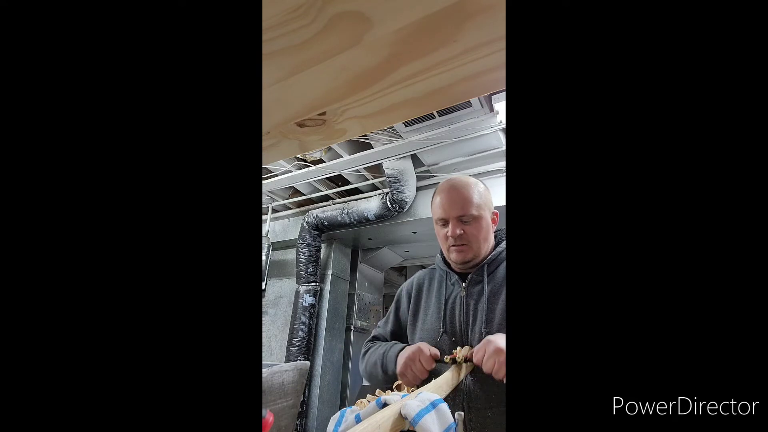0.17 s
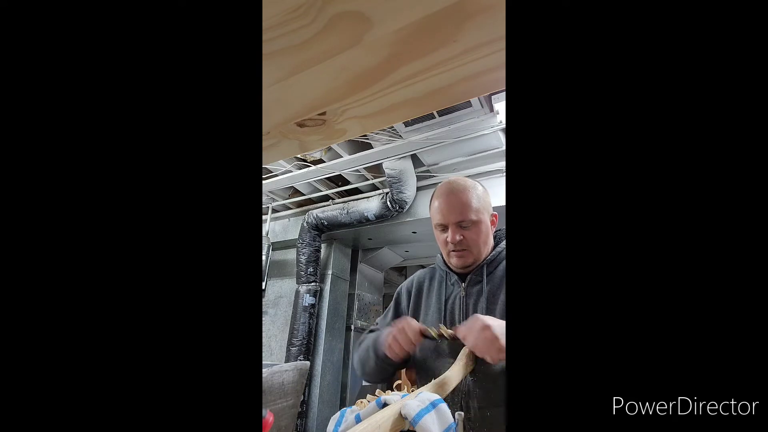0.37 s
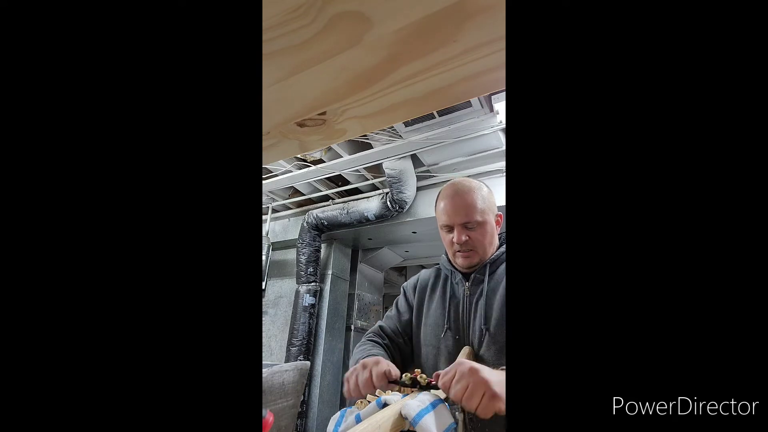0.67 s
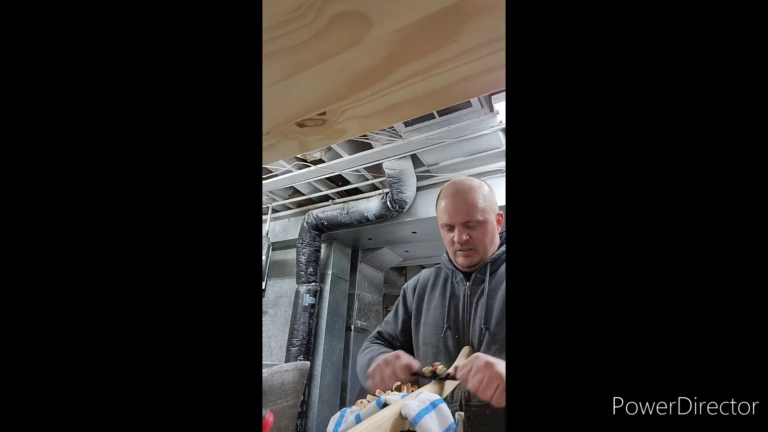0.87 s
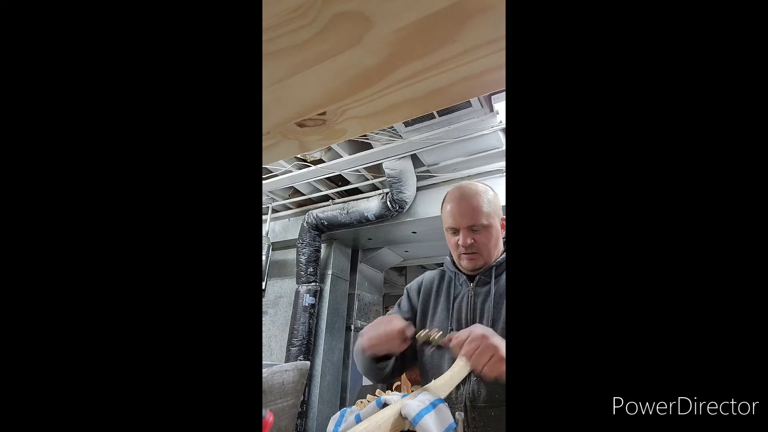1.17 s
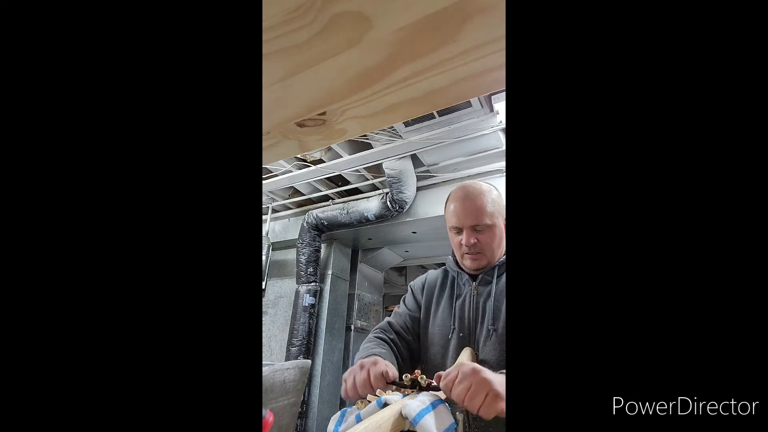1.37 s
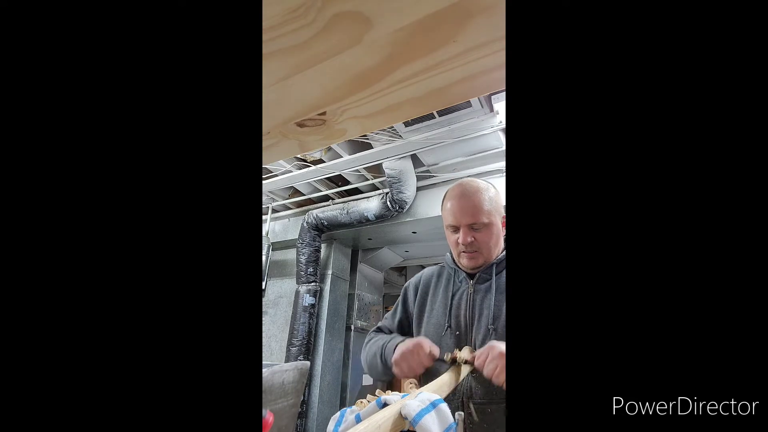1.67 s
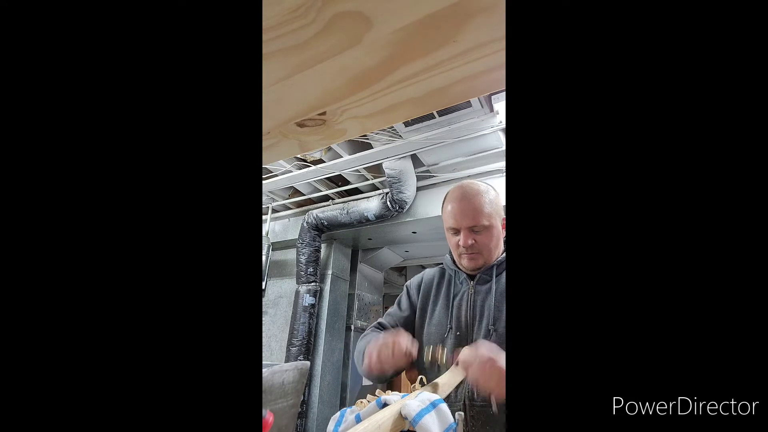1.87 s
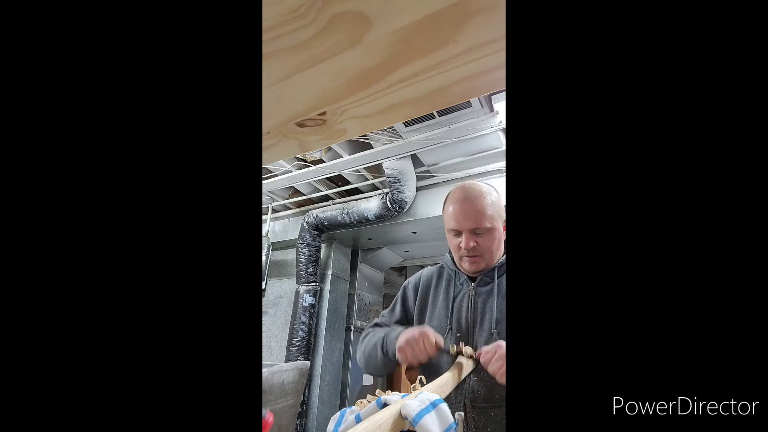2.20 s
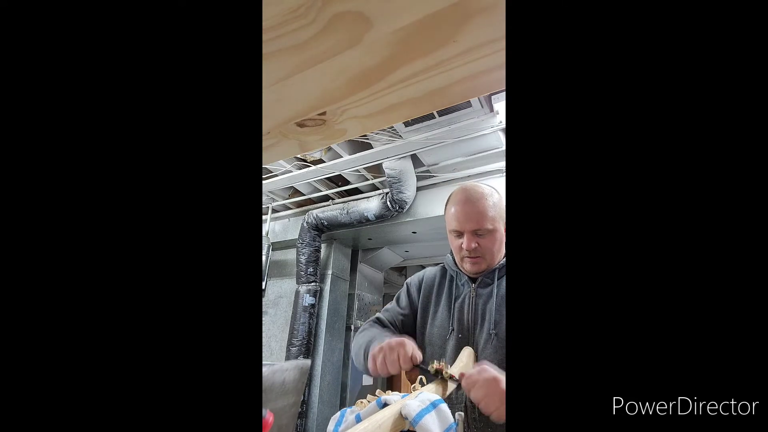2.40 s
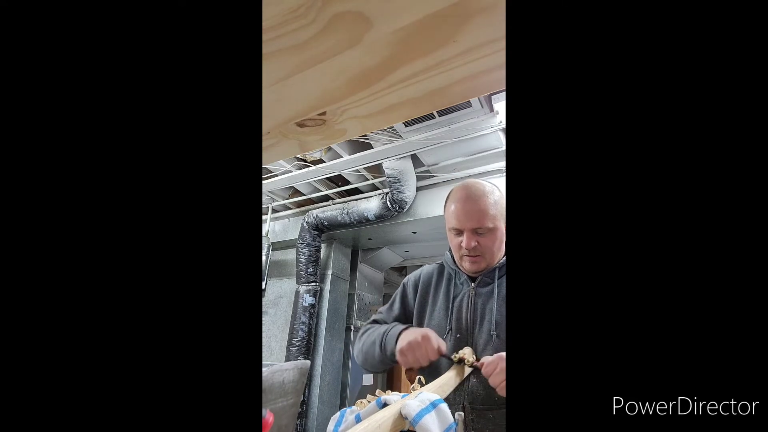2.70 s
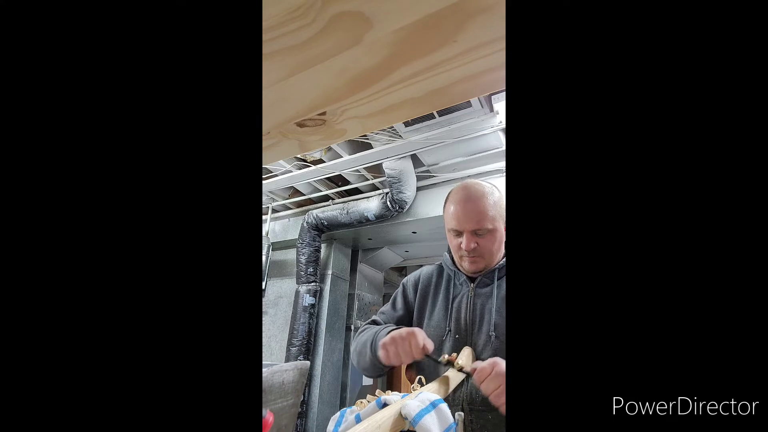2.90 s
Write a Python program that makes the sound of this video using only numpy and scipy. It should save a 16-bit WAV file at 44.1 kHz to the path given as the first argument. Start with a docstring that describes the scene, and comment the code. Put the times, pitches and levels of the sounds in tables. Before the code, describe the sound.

A spokeshave makes five quick rasping cuts and one faint slide along a wooden handle, with slight squeaks. Between cuts the tool clacks against the wood and the bench thuds. Ventilation rumbles faintly in the small workshop.

```python
"""A small workshop: a spokeshave makes five quick cuts and one faint slide along a wooden handle.
The blade tears fibres, rasping, hissing and squeaking along the grain. Each time the tool meets
the wood it clacks and sets tool and handle ringing; the bench that holds the work shudders with
the drag and booms when jolted. One fibre snaps, the iron clinks, and ventilation rumbles faintly."""
import sys
import numpy as np
from scipy import signal
from scipy.fft import rfft, irfft, next_fast_len
from scipy.io import wavfile

SR = 44100
rng = np.random.default_rng(int(sys.argv[2]) if len(sys.argv) > 2 else 0)


def int16_out(signal):
    """Quantize to a 16-bit WAV file."""
    q = np.round(np.clip(np.atleast_2d(signal).T, -1, 1) * 32767)
    wavfile.write(sys.argv[1], SR, q.astype(np.int16))


N = 134505
TIME = np.arange(N) / SR
RING_DB = -7.5  # trim on the struck ringing of tool, handle and iron

# modes of the tool on the work: pitch_hz, struck_db, rubbed_db, t60_s
TOOL_MODES = [(746.4, -5.5, -2.5, 0.062), (1076, -15, -23, 0.071), (1310, -5.5, -9, 0.024),
              (1441, -13, -4, 0.07), (1653, -8, -5, 0.16), (1940, -16.5, -14, 0.17),
              (2459, -16, -11.5, 0.11), (2590, -17.5, -4.5, 0.04), (2862, -10.5, -2, 0.043),
              (3067, -12.5, -5.5, 0.029), (3660, -19, -6.5, 0.058), (4240, -15, -10, 0.04),
              (4774, -23, -6, 0.065)]
# stereo image, near mono in the bass and wide above: frequency_hz, left_right_correlation
STEREO_LIKENESS = [(60, 0.97), (130, 0.99), (250, 1), (480, 0.88), (950, 0), (3800, 0.17), (15000, 0)]


def from_db(db):
    """Decibels to gain."""
    return 10 ** (np.asarray(db) / 20)


def unit_power(x):
    """Scale to an RMS of one."""
    return x / np.sqrt(np.mean(x ** 2) + 1e-20)


def at_hz(points, hz):
    """Read a curve on a log-frequency axis."""
    frequencies, values = np.transpose(points)
    return np.interp(np.log(hz + 1e-3), np.log(frequencies), values)


def noise(colour):
    """Coloured stereo noise, alike in both ears only in the bass."""
    size = next_fast_len(N)
    hz = np.arange(size // 2 + 1) * SR / size
    mid, side = rfft(rng.standard_normal((2, size)))
    alike = at_hz(STEREO_LIKENESS, hz)
    pair = np.sqrt(1 + alike) * mid + np.sqrt(1 - alike) * side * [[1], [-1]]
    spectrum = pair * from_db(at_hz(colour, hz)) * (hz > 20)
    return unit_power(irfft(spectrum, size)[:, :N])


def flutter(per_s, depth_db):
    """A gain that wanders at random."""
    knots = rng.standard_normal(N)
    return from_db(depth_db * np.interp(TIME * per_s, np.arange(N), knots))


def wavering(hz, waver_hz):
    """A tone of unit power whose pitch wanders, differently left and right."""
    knots = rng.standard_normal((2, 1000))
    wander = np.array([np.interp(TIME * 150, np.arange(len(row)), row) for row in knots])
    return np.sqrt(2) * np.sin(2 * np.pi * np.cumsum(hz + waver_hz * wander, axis=1) / SR)


def ring(x, hz, t60):
    """One mode: a unit click starts a dying sine of height 1."""
    decay, step = from_db(-60 / (t60 * SR)), 2 * np.pi * hz / SR
    return signal.lfilter([0, np.sin(step)], [1, -2 * decay * np.cos(step), decay ** 2], x + 1e-18)


def driven(x, hz, t60):
    """A mode that passes on the power of a noisy drive."""
    return ring(x, hz, t60) * np.sqrt(4 * np.log(1000) / (t60 * SR))


def ventilation():
    """Moving air: a low rush with a faint hum and whine."""
    # colour of the rush: frequency_hz, level_db
    air_colour = [(15, -29), (25, 3.5), (96, 1), (165, 2), (261, -10), (315, -6.5), (555, -13),
                  (671, -19.5), (855, -13), (1120, -25), (1680, -26.5), (2030, -31), (2200, -31),
                  (4670, -32.5), (8460, -55.5), (12700, -57), (15700, -59)]
    # hum and whine: pitch_hz, level_db
    vent_tones = [(135, -48.5), (1672, -73.5)]
    tones = sum(from_db(db) * wavering(hz, waver_hz=12.9)[0] for hz, db in vent_tones)
    return from_db(-42) * noise(air_colour) + tones


def fibres(per_s=5000, spread_db=3, cap_db=12):
    """Wood grit: tiny clicks of uneven size, different left and right."""
    sizes = from_db(np.minimum(rng.exponential(spread_db, (2, N)), cap_db))
    signs = rng.choice([-1, 1], (2, N))
    return unit_power(sizes * signs * (rng.random(N) < per_s / SR))


def cuts():
    """The blade tears fibres, which rasp, hiss and ring the tool; the bench shudders with the drag."""
    # one envelope per slide along the wood: time_s, rasp_db, hiss_db, shudder_db
    slides = [
        [(0.0, -44.5, -58, -38.5), (0.058, -40, -53, -33), (0.082, -42.5, -47, -59), (0.092, -36.5, -43.5, -28),
         (0.112, -52, -60, -46), (0.156, -74, -64, -58), (0.18, -74, -87, -41)],
        [(0.48, -81, -103, -63), (0.526, -73, -85, -58), (0.54, -58, -81, -58), (0.572, -69, -70, -64),
         (0.592, -54, -65, -56), (0.616, -69, -79, -69), (0.645, -52, -67, -61)],
        [(0.74, -56, -71, -39), (0.89, -48, -49.5, -41), (0.958, -52.5, -63, -85), (1.004, -49.5, -56, -76),
         (1.03, -43.5, -56, -32.5), (1.068, -48, -50.5, -21.5), (1.18, -75, -86, -73)],
        [(1.46, -74, -96, -33.5), (1.512, -50.5, -62, -42), (1.588, -46.5, -54.5, -39.5),
         (1.684, -45.5, -58, -40.5), (1.772, -48.5, -57, -27.5), (1.79, -56, -56, -61), (1.86, -67, -99, -52)],
        [(2.06, -50, -65, -32), (2.09, -49, -83, -31), (2.162, -49.5, -69, -39), (2.232, -46.5, -53, -24),
         (2.278, -48.5, -60, -29.5), (2.294, -66, -86, -33), (2.37, -65, -109, -41.5)],
        [(2.56, -48, -78, -45), (2.656, -46.5, -66, -39), (2.692, -40, -44.5, -22), (2.72, -44.5, -46.5, -31),
         (2.786, -52, -89, -28), (2.854, -73, -84, -38.5), (2.93, -56, -109, -40)],
    ]
    # colour of the rasp: frequency_hz, level_db
    rasp_colour = [(200, 15), (500, 6), (900, 5.5), (2100, -3), (3000, -7), (4800, -4), (7000, -14),
                   (9000, -53), (16000, -40)]
    # colour of the bench's shudder: frequency_hz, level_db
    shudder_colour = [(25, -25), (50, 15.5), (80, -9.5), (125, 4.5), (180, -8), (280, -9.5), (500, -23),
                      (1000, -18.5), (4000, -62.5)]
    fade_s = 0.072
    rasp_level, hiss_level, shudder_level = levels = np.zeros((3, N))
    for slide in slides:
        times, *curves_db = np.transpose(slide)
        outside_s = np.maximum(times[0] - TIME, TIME - times[-1])
        fade = np.clip(1 - outside_s / fade_s, 0, 1)
        for level, db in zip(levels, curves_db):
            level += fade * from_db(np.interp(TIME, times, db))
    grit = fibres() * rasp_level
    rings = sum(from_db(db - 8) * driven(grit * flutter(per_s=40, depth_db=4), hz, t60)
                for hz, _, db, t60 in TOOL_MODES)
    rasp = rasp_level * (from_db(-2) * noise(rasp_colour) + rasp_climbs())
    hiss = from_db(-4) * hiss_level * (high_hiss() + splinters())
    shudder = from_db(-2) * shudder_level * noise(shudder_colour)
    return rings + (rasp + hiss) * flutter(per_s=39, depth_db=1.5) + shudder


def high_hiss():
    """The finest tearing noise, louder on the left."""
    # colour of the hiss: frequency_hz, level_db
    hiss_colour = [(2000, -26), (6000, 8), (7500, 4), (9500, -3.5), (11000, 1.5), (12500, 6), (15500, 5.5)]
    return noise(hiss_colour) * from_db([[2.5], [-2.5]])


def splinters():
    """Sparse bright ticks of fibres parting at the edge."""
    ticks = fibres(per_s=210, spread_db=15, cap_db=45)
    highpass = signal.butter(2, 11300, "high", fs=SR, output="sos")
    return from_db(-11.5) * unit_power(signal.sosfilt(highpass, ticks + 1e-18))


def squeaks():
    """The blade catches: short stick-slip tones that swell and fade."""
    # catches of the blade: start_s, length_s, pitch_hz, level_db
    catches = [(0.0, 0.015, 3920, -45), (0.011, .022, 3700, -50), (0.051, 0.073, 1810, -44),
               (0.89, 0.096, 3040, -51), (1.636, 0.033, 1367, -42.5), (1.67, 0.037, 3700, -53),
               (1.782, 0.053, 4070, -61)]
    out = 0
    for start, length, hz, db in catches:
        swell = np.sin(np.pi * np.clip((TIME - start) / length, 0, 1))
        out += from_db(db) * swell * wavering(hz, waver_hz=34.9)
    return out


def thuds():
    """Soft pushes boom the bench: the longer the push, the duller the thud; the grip shifts its pitch."""
    # jolts of the work against the bench: start_s, level_db, push_s, pitch_ratio
    jolts = [(0.109, -19, 0.0077, 0.56), (0.221, -3, 0.0017, 1.154), (0.2281, -1, 0.0012, 1),
             (0.665, -8.5, 0.0052, 0.826), (0.872, -9.5, 0.015, 0.84), (1.039, -15, 0.0028, 0.48),
             (1.054, -21, 0.0061, 1.06), (1.065, -8, 0.0048, 1.12), (1.395, -7, 0.0043, 1.13),
             (1.404, -10.5, 0.0075, 0.97), (1.736, -9.5, 0.0052, 0.66), (1.765, -10.5, 0.0026, .85),
             (2.024, -7.5, 0.0043, 1.065), (2.084, -7, 0.0017, 0.73), (2.206, -6.5, 0.0067, 0.95),
             (2.279, -15, 0.0019, 0.68), (2.517, -6, 0.0069, 0.856)]
    # modes of the bench: base_pitch_hz, level_db, t60_s
    bench_modes = [(67, -16.5, 0.21), (111.3, 0, 0.078), (134, 0, 0.038), (200, 1.5, 0.031),
                   (330.8, -3.5, 0.06), (410.7, -2, 0.039), (538, -14.5, 0.06), (705, -11, .045)]
    out, age = np.zeros((2, N + SR)), TIME[:SR // 2]
    build_up = 1 - np.exp(-age / 0.0016)  # the bench takes a moment to get moving
    for start, level_db, push_s, ratio in jolts:
        push = np.sin(np.pi * np.minimum(age / push_s, 1)) ** 2
        first = int(start * SR)
        for k, (hz, mode_db, t60) in enumerate(bench_modes):
            gain = (-1) ** k * from_db(level_db + mode_db - 1)
            swing = gain * ring(push / push.sum(), hz * ratio, t60) * build_up
            speed = np.gradient(swing) * SR / (2 * np.pi * hz * ratio)
            # speed and swing lie a quarter cycle apart, which gives the stereo width
            alike = at_hz(STEREO_LIKENESS, hz)
            mid, side = np.sqrt((1 + alike) / 2) * speed, np.sqrt((1 - alike) / 2) * swing
            out[:, first:first + len(age)] += mid + side * [[1], [-1]]
    return out[:, :N]


def clacks():
    """Tool meets wood: a short gritty crunch that cracks and sets tool and handle ringing."""
    # contacts, most ringing the handle at the pitch of the spot they touch; rows near 520 Hz are the hollow
    # tock as the blade runs off the end of the cut: start_s, level_db, # attack_s, length_s, treble_db,
    # hiss_db, handle_db, handle_pitch_hz, left_over_right_db
    contacts = [(0.134, -42.5, .002, 0.0054, -11, -12, 2.5, 1400, -1),
                (0.188, -36.5, .002, 0.0056, -3.5, -15, 3, 1750, -1),
                (0.208, -41.5, .0065, 0.0086, -1, 39.5, -1, 1300, 0),
                (0.218, -19.5, .0017, 0.0068, -10.5, -10, -6, 1393, -5.5),
                (0.228, -20.5, .0011, .007, 0, 21, -6.5, 2970, 2.5),
                (0.252, -36.5, .0026, 0.023, -1.5, 22.5, -2.5, 3280, -4),
                (0.345, -49.5, .003, 0.013, -7, 23.5, -11, 1700, 1),
                (0.6611, -19, .0012, 0.0052, -1, 6, 3.5, 1014, -1.5),
                (0.674, -37.5, .002, 0.0042, -6, -3, 12, 1930, 4),
                (1.027, -46.5, .0046, .02, -2, 37.5, -7, 2800, 1),
                (1.064, -43.5, 0.006, 0.014, -4.5, 25, 11.5, 530, -6),
                (1.387, -22, 0.0021, 0.0065, 0, 11, 3, 1110, -2),
                (1.411, -37, .002, 0.008, -8, -8, -6, 1490, 1),
                (1.584, -40, 0.0059, 0.012, -1.5, 23, 3, 1644, -4),
                (1.728, -44, .008, 0.012, 0, 18, 12.5, 1178, -11),
                (1.767, -35, 0.001, 0.0083, -7, 18.5, 9, 530, -1),
                (2.0191, -26, 0.0032, 0.008, 0, 8, 13, 1156, -6),
                (2.07, -43, .002, 0.0054, -3, -11, 1, 1370, 5),
                (2.086, -27, .0036, 0.0072, -14, -24, 8.5, 517, 0),
                (2.11, -37.5, .002, 0.0086, 2, -9, 0.5, 2390, -2.5),
                (2.182, -39, .0015, 0.013, -3.5, -6, 4, 1450, -2.5),
                (2.227, -39, .004, 0.019, -1.5, 1, 0.5, 2870, -7),
                (2.278, -35.5, 0.0028, 0.0038, -7, -25, 5.5, 537, -1.5),
                (2.288, -36, .002, 0.012, -2, -16, 1.5, 2354, 1.5),
                (2.512, -21.5, 0.003, 0.011, 1.5, -4, 8, 1173, -1.5),
                (2.559, -41, .003, 0.012, -7, -13, 14.5, 1400, -2),
                (2.598, -35.5, .0015, 0.012, 4, -8, 4.5, 2265, -2.5),
                (2.684, -35, .0015, 0.0059, 5.5, 7, 6, 1600, -1),
                (2.747, -41, .0028, 0.0085, 4, 19, -4, 2940, -1),
                (2.776, -35, .0012, 0.0079, -4, -8, -8, 2310, -4.5)]
    # colour of the woody knock: frequency_hz, level_db
    knock_colour = [(150, 3.5), (330, 10), (550, -1.5), (750, 7), (1150, 3), (1600, -5.5), (2200, -5.5),
                    (3500, -55.5), (16000, -77)]
    # colour of the bright crack: frequency_hz, level_db
    crack_colour = [(500, -46.5), (1500, -3), (2700, 12.5), (3700, 7), (5000, -3.5), (7300, -9.5),
                    (9000, -59), (16000, -72)]
    graze_s, decay_s, handle_t60_s = 0.0065, 0.007, 0.032  # the hands damp the handle
    body, treble, top, handle = np.zeros((4, 2, N))
    grit, handle_grit = fibres(), fibres()
    for start, db, attack, length, treble_db, hiss_db, handle_db, handle_hz, pan_db in contacts:
        near = np.abs(TIME - start) < 0.1
        age = TIME[near] - start
        # the sole grazes the wood just before it lands
        graze = from_db(-20) * np.exp(np.minimum(age, 0) / graze_s)
        rise = np.clip(age / attack, 0, 1) + graze
        fall = np.exp(-np.maximum(age - length, 0) / decay_s)
        envelope = rise * fall * from_db([[db + pan_db / 2], [db - pan_db / 2]])
        body[:, near] += envelope
        treble[:, near] += from_db(treble_db) * envelope
        top[:, near] += from_db(hiss_db) * envelope
        handle_drive = handle_grit[:, near] * envelope
        handle[:, near] += from_db(handle_db) * driven(handle_drive, handle_hz, handle_t60_s)
    tool = sum(from_db(db) * driven(grit * (body if hz < 2000 else treble), hz, t60)
               for hz, db, _, t60 in TOOL_MODES)
    knock = from_db(-1) * body * noise(knock_colour)
    crack = from_db(-8) * treble * noise(crack_colour)
    hiss = from_db(-36.5) * top * high_hiss()
    crunch = (knock + crack + hiss) * flutter(per_s=680, depth_db=2)
    return from_db(RING_DB) * (handle + tool) + crunch


def rasp_climbs():
    """The rasp's resonance climbs, slowly at first, as the blade nears the end of the handle."""
    # climbing stretches of the long cuts: start_s, end_s
    stretches = [(0.879, 0.96), (1.58, 1.76)]
    from_hz, to_hz, width_hz = 2850, 3600, 650
    lowpass = signal.butter(2, width_hz / 2, fs=SR, output="sos")
    wobble = unit_power(signal.sosfilt(lowpass, rng.standard_normal((2, N))))
    sweeps = 0
    for start, end in stretches:
        progress = np.clip((TIME - start) / (end - start), 0, 1)
        hz = from_hz + (to_hz - from_hz) * progress ** 2
        swell = np.sqrt(np.abs(np.sin(np.pi * progress)))
        sweeps += swell * np.sin(2 * np.pi * np.cumsum(hz) / SR)
    return from_db(-6) * np.sqrt(2) * sweeps * wobble  # the wobble smears the tone into a noise band


def snap(at_s=2.0348):
    """A fibre snaps with one sharp, bright tick."""
    # modes of the tick: pitch_hz, level_db, t60_s
    tick_modes = [(4330, -27, 0.0056), (4600, -24, 0.0061)]
    click = np.zeros(N)
    click[int(at_s * SR)] = 1
    return sum(from_db(db) * ring(click, hz, t60) for hz, db, t60 in tick_modes)


def clinks(decay_s=0.005):
    """Jarred in its seat, the iron rattles and rings; its two close top modes beat roughly."""
    # jars to the iron: start_s, level_db
    jars = [(2.233, -33), (2.294, -42), (2.519, -21), (2.607, -37), (2.691, -51), (2.783, -42)]
    # modes of the iron: pitch_hz, level_db, t60_s
    iron_modes = [(3700, 5.5, 0.049), (7100, -14, 0.1), (7240, -14.5, 0.11)]
    envelope = sum(from_db(db) * (TIME > start) * np.exp(-np.abs(TIME - start) / decay_s)
                   for start, db in jars)
    rattle = fibres() * envelope
    return from_db(RING_DB) * sum(from_db(db) * driven(rattle, hz, t60) for hz, db, t60 in iron_modes)


def workshop(sound, build_s=0.006):
    """The small room answers with a short diffuse tail."""
    # reverb bands: centre_hz, t60_s, level_db
    room_bands = [(123.4, 0.19, -13.5), (404, 0.12, -11.5), (1078, 0.19, -15), (2700, 0.2, -14.5),
                  (7400, 0.17, -11.5)]
    age, tail = TIME[:SR // 2], 0
    white = noise([(20, 0), (20000, 0)])[:, :len(age)]
    for hz, t60, db in room_bands:
        bandpass = signal.butter(2, [hz / 1.7, hz * 1.7], "band", fs=SR, output="sos")
        envelope = from_db(-60 * age / t60) * np.minimum(age / build_s, 1)
        band = signal.sosfilt(bandpass, white) * envelope
        tail += from_db(db) * unit_power(band) / np.sqrt(len(age))
    return signal.fftconvolve(sound, tail, axes=1)[:, :N]


def scene():
    """Tool and bench in their room, over a bed of ventilation."""
    tool = cuts() + squeaks() + clacks() + snap() + clinks()
    bench = thuds()
    room = workshop(tool + from_db(-12.5) * bench)  # thuds travel mostly through the bench, not the room
    return ventilation() + tool + bench + room


def record(dry):
    """The microphone has a dip in the treble; peaks are clipped and the top is cut."""
    dip_hz, dip_width_hz, dip_db, cutoff_hz = 9500, 4300, -4, 15600
    notched = signal.lfilter(*signal.iirnotch(dip_hz, dip_hz / dip_width_hz, fs=SR), dry)
    dipped = notched + from_db(dip_db) * (dry - notched)
    lowpass = signal.ellip(10, 0.1, 80, cutoff_hz, fs=SR, output="sos")
    return signal.sosfilt(lowpass, np.clip(dipped, -1, 1))


dry = scene()
out = record(dry)
int16_out(out)
```